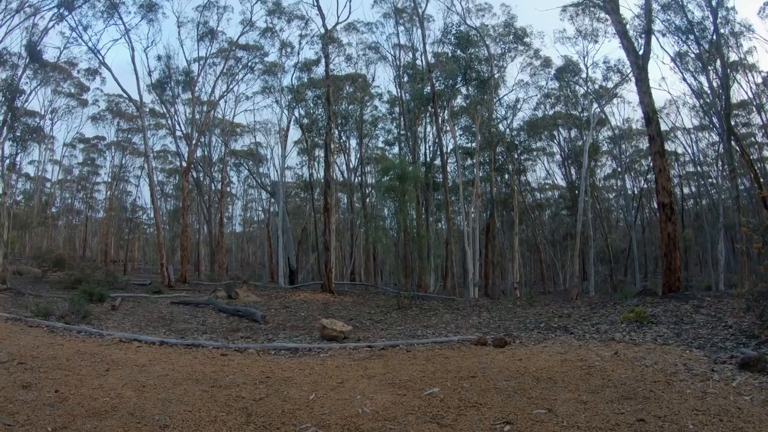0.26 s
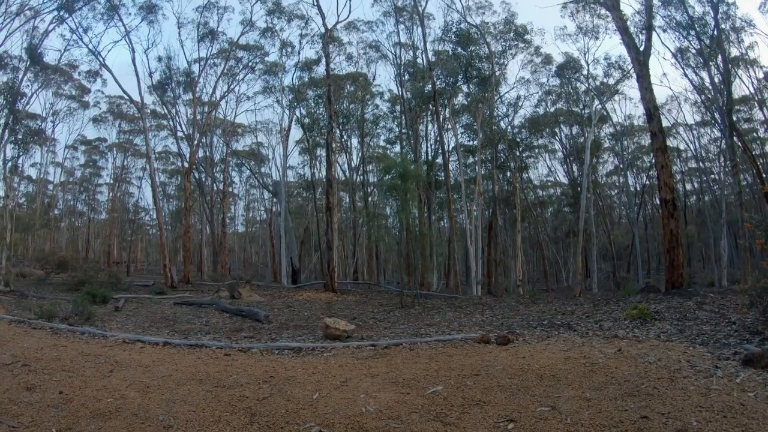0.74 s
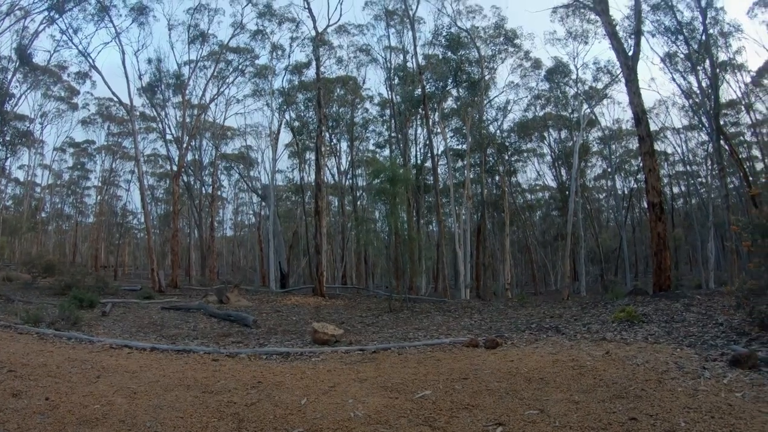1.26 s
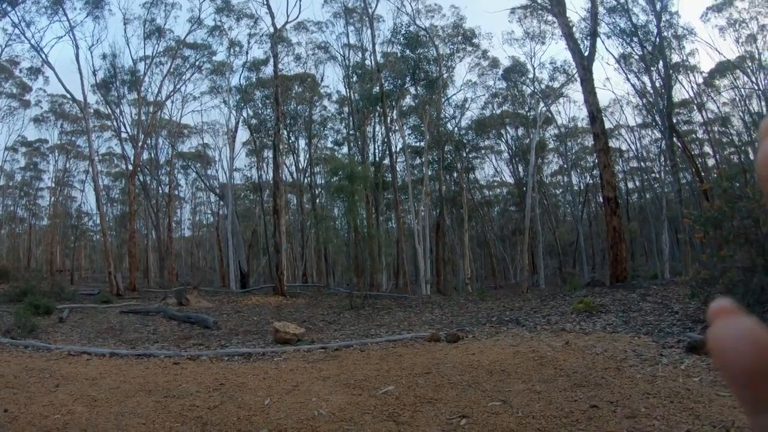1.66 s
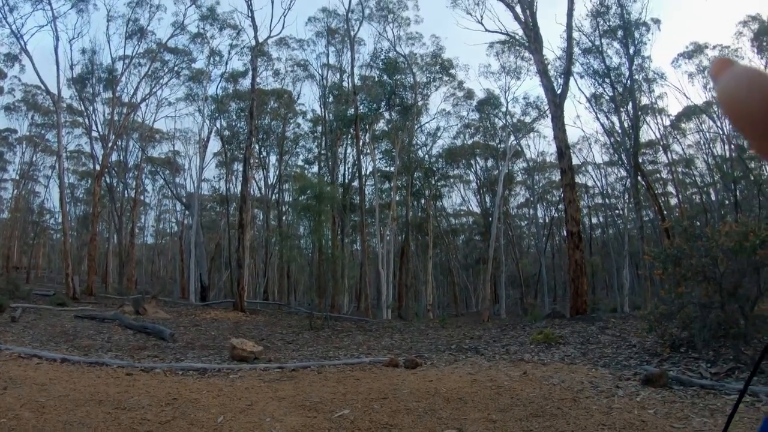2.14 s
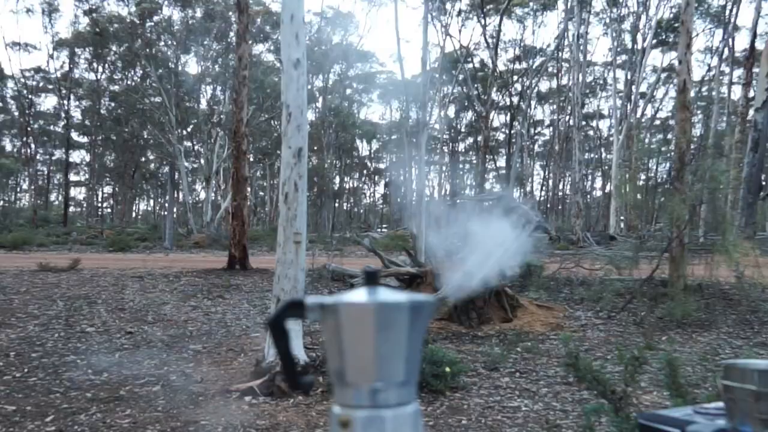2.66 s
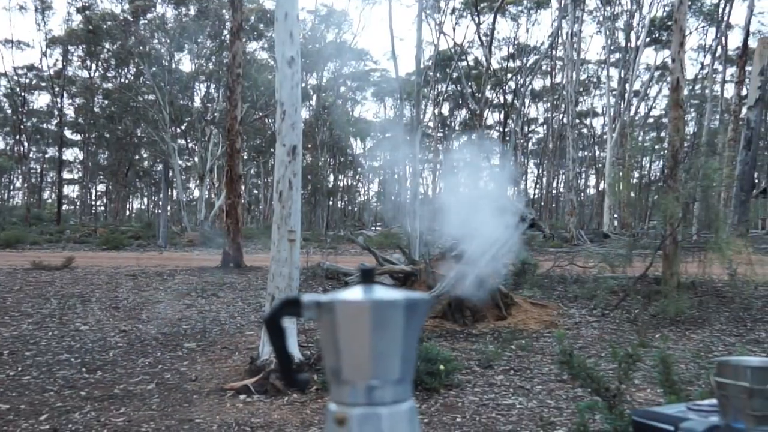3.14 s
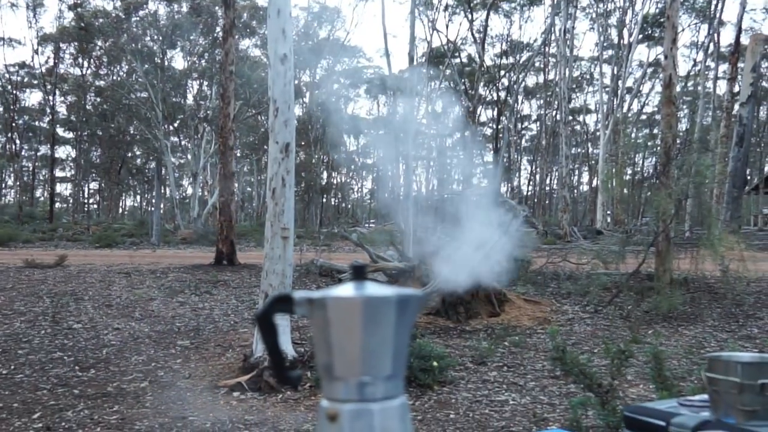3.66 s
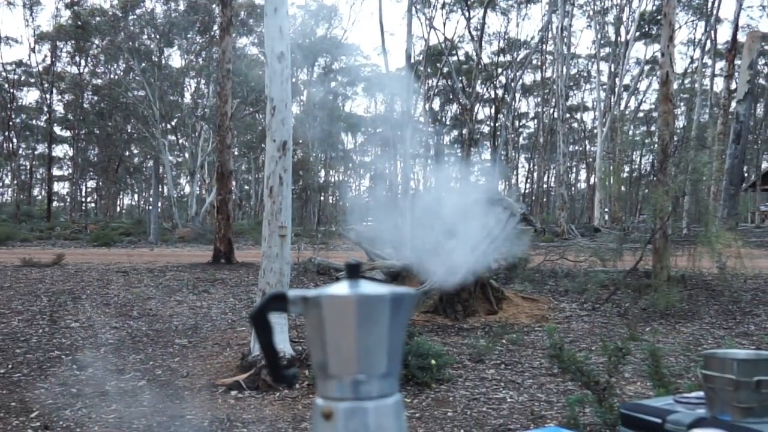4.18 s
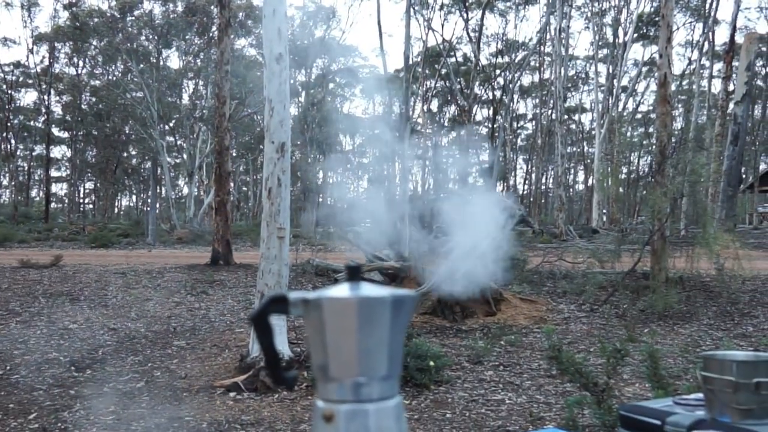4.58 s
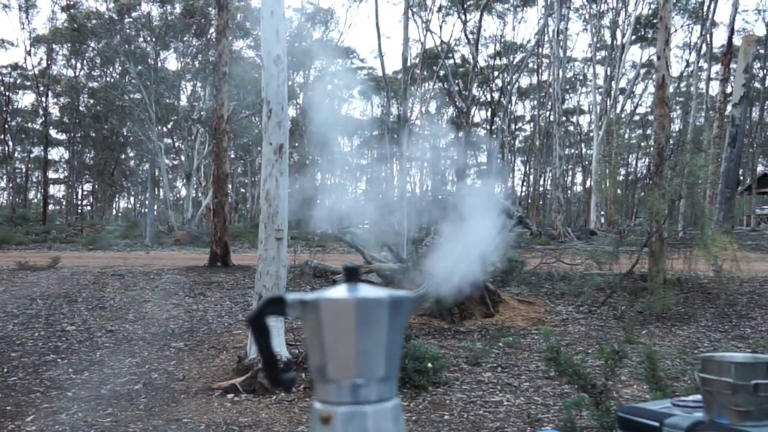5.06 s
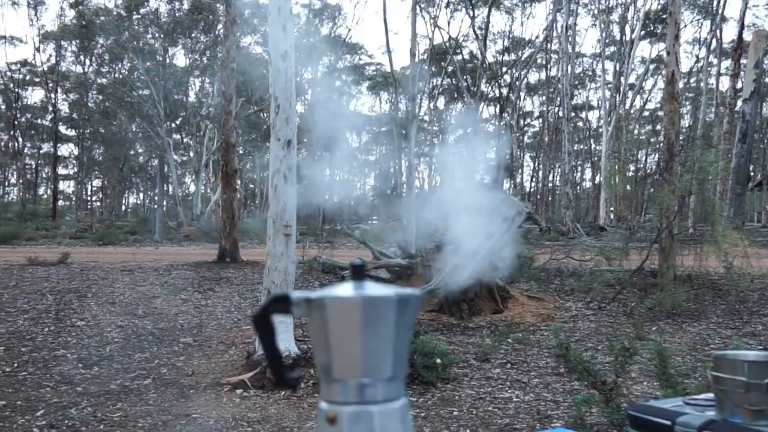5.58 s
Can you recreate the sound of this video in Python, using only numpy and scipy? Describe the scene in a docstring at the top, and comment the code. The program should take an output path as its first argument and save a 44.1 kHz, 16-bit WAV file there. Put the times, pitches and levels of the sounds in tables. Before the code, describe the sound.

A hushed outdoor forest with faint bird whistles. Fingers softly bump the camera, then a hard knock, skin rubbing and a low thud come directly through its case. At about 2.7 seconds it cuts abruptly to a metal stovetop coffee pot close to the microphone, gurgling in fast uneven bursts, spitting on its lid and hissing steam more strongly until the end.

```python
"""Faint birds at a quiet forest campsite; a hand bumps, knocks and rubs a camera body.
At CUT_S the hand gives way to a stovetop moka pot ending its brew; forest and birds run on underneath.
Hand: clicks and shaped noise excite the case; slow damped swings are its flexing. Birds: gliding sines.
Pot: steam bursts thump the chamber and spit on the metal lid; filtered noise is the hiss and the
bright, slowly growing jet, over a soft burner roar."""
import sys
import numpy as np
from scipy import signal
from scipy.fft import rfft, irfft, next_fast_len
from scipy.io import wavfile
from scipy.ndimage import uniform_filter1d

SR = 44100
rng = np.random.default_rng(int(sys.argv[2]) if len(sys.argv) > 2 else 0)


def generate_wav(signal):
    """Clip the signal to [-1, 1] and save it as 16-bit WAV at the path in sys.argv[1]."""
    frames = np.transpose(np.atleast_2d(signal))
    scaled = np.clip(frames, -1, 1) * 32767
    pcm = np.round(scaled).astype(np.int16)
    wavfile.write(sys.argv[1], SR, pcm)


N = 256662
T = np.arange(N) / SR  # time_s
CUT_S, CUTOFF_HZ = 2.699, 15750

# Levels in the tables are relative; the source functions add trims in dB.
# Forest bed spectrum: band_hz, gain_db
FOREST_SPECTRUM = [(15, -33), (25, -9), (53, 2.5), (98, -8.5), (202, 1), (394, -11), (573, -8.5), (729, -2),
                   (856, -0.5), (1030, -11), (1350, -14.5), (2780, -18.5), (3630, -25.5), (9270, -31.5),
                   (15000, -43)]
# Forest bed left-right likeness: band_hz, likeness (-1 to 1)
FOREST_LIKENESS = [(60, -0.17), (240, -0.59), (950, -0.83), (3770, 0.3), (15000, -0.26)]
# Distant bird calls: start_s, length_s, start_hz, end_hz, level_db, waver_hz (rms)
BIRD_CALLS = [(-0.08, 0.26, 2650, 2650, -57, 322), (0.127, 0.21, 2750, 2750, -60, 325),
              (0.01, 0.021, 2950, 3100, -62, 30), (0.168, .035, 3000, 3100, -58, 30),
              (0.4, 0.1, 1540, 1460, -67, 50), (0.685, 0.15, 1775, 1770, -68, 25),
              (.78, .1, 2280, 2350, -72, 25), (1.147, 0.058, 2900, 2700, -66, 70),
              (1.628, 0.036, 2850, 2670, -36.5, 55), (1.827, 0.015, 2900, 2610, -34, 45.8),
              (3.674, .12, 2620, 2870, -45.5, 122), (3.797, 0.198, 2780, 2750, -47, 167)]

# Finger bumps on the camera: start_s, bump_db, tick_db, left_minus_right_db (bump only)
BUMPS = [(0.061, -36, -45, 1), (0.482, -48.5, -67, -8), (0.579, -53.5, -69, -10), (0.613, -58, -70, -11),
         (0.963, -50, -70, 11), (1.22, -47.5, -56, -15), (1.265, -59, -43, 2), (1.274, -46, -53, 5),
         (1.475, -40.5, -46, -13), (1.516, -37.5, -34, -10), (1.605, -34, -32.5, -7),
         (1.616, -34.5, -36, -11), (2.222, -37, -38, 11)]
# Dull bump spectrum: band_hz, gain_db
BUMP_SPECTRUM = [(40, -8), (90, -22), (150, 10.5), (230, 0), (320, -8.5), (450, -21), (700, -16),
                 (2000, -64)]
# Fingertip tick spectrum: band_hz, gain_db
TICK_SPECTRUM = [(300, -18), (800, -4), (1080, 0.5), (1300, 8.5), (1550, 1), (2000, 0), (3000, -9),
                 (5000, -37), (10000, -28), (16000, -60)]
# Hard knocks on the case: start_s, knock_db, treble_re_knock_db
KNOCKS = [(1.6809, -20, -11), (1.6867, 1, -9.5), (1.6961, -21, -6), (1.7, -14, -16), (1.7041, -10.5, -13),
          (1.7139, -10.5, -3.5), (1.7996, -37, 18), (1.924, -52, -7), (2.4539, -28, -5)]
# Case spectrum under a knock: band_hz, gain_db
CASE_SPECTRUM = [(200, -12), (600, -12.5), (1000, -12), (1350, -2.5), (1600, -11), (1950, 2), (2250, -4),
                 (2750, 1), (3500, -13), (4400, -10.5), (5300, -24.5), (12000, -44)]
# Treble crack spectrum of a knock: band_hz, gain_db
CRACK_SPECTRUM = [(2000, -22.5), (4400, -6), (5500, -7), (6700, 9), (8500, -2), (10000, -5), (12000, -31),
                  (16000, -49)]
# Case flexing under the grip: start_s, swing_hz, level_db, decay_s, right_to_left_ratio
FLEXES = [(0.059, 70.5, -39, 0.0059, 2.7), (1.689, 241, -21, 0.0075, 0.17), (1.695, 149, -19, 0.0081, 0.02),
          (1.704, 63, -25, 0.011, 2.6), (1.799, 44.4, -33, 0.012, 0.76), (2.577, 30.6, -4, 0.022, -0.48),
          (2.636, 71.4, -21, 0.01, 0.95)]
# Strokes of skin over the case: start_s, length_s, body_db, friction_db, rumble_db
STROKES = [(1.262, 0.014, -64, -63, -47), (1.29, 0.02, -56.5, -52, -64), (1.41, 0.02, -47.5, -48, -50),
           (1.46, 0.014, -49, -54.5, -51), (1.71, 0.036, -32.5, -36, -31.5), (1.76, 0.04, -45, -46, -45),
           (1.795, 0.073, -38.5, -36, -45), (1.87, 0.062, -33, -29.5, -70), (1.955, 0.058, -43, -38.5, -66),
           (2.04, 0.036, -44.5, -40.5, -42), (2.212, 0.097, -41.5, -34.5, -40),
           (2.34, 0.013, -45, -79, -35), (2.388, 0.023, -49, -53.5, -46), (2.455, 0.081, -43.5, -39.5, -44),
           (2.545, 0.068, -37.5, -46.5, -29), (2.585, 0.021, -34, -50, -17.5),
           (2.64, 0.046, -45.5, -61, -21.5)]
# Hand resting on the case: body_db, friction_db, rumble_db
GRIP_DB = [-59, -63.5, -59]
# Rubbed case spectrum: band_hz, gain_db
RUB_BODY_SPECTRUM = [(100, -34), (160, -8), (300, -25), (600, -18.5), (1150, -10), (1300, 13), (1440, 0.5),
                     (1650, 1), (2000, -1), (2400, -2.5), (3200, -23), (6000, -53)]
# Skin friction spectrum: band_hz, gain_db
FRICTION_SPECTRUM = [(1700, -32), (2700, -2), (3300, 2), (3900, -0.5), (4800, -4.5), (6000, -3.5),
                     (7500, -4.5), (8300, -6), (9200, -8), (10500, -15.5), (12000, -25.5), (15500, -33)]
# Shaken case spectrum: band_hz, gain_db
RUMBLE_SPECTRUM = [(12, -2), (25, -3), (45, -7), (80, -35), (160, -22.5), (400, -44.5), (1000, -85)]
# Rubbing left-right likeness: band_hz, likeness (-1 to 1)
RUB_LIKENESS = [(60, -0.31), (600, -0.78), (1300, -0.9), (1700, -0.43), (2200, 0.097), (3200, 0.58),
                (6800, -0.1), (15000, 0)]

# Burner roar spectrum: band_hz, gain_db
BURNER_SPECTRUM = [(20, -30), (45, -13), (85, -4.5), (140, 2.5), (250, -7.5), (400, 2), (700, -7),
                   (1500, -74)]
# Steady steam flow, growing as the pot runs dry: time_s, jet_db
STEAM_FLOW = [(2.7, -52), (3.08, -50.5), (3.25, -45.5), (3.8, -47), (4.5, -42.5), (4.95, -42.5),
              (5.25, -40.5), (5.82, -38)]
# Steam puffs on top of the flow: start_s, length_s, jet_db
STEAM_PUFFS = [(2.735, 0.056, -46), (2.84, 0.052, -48.5), (3.148, 0.02, -39.5), (3.345, 0.031, -43.5),
               (3.63, 0.021, -41), (3.97, 0.22, -45.5), (4.29, 0.045, -41.5)]
# Broad hiss spectrum: band_hz, gain_db
HISS_SPECTRUM = [(410, -1), (700, -2), (832, -17), (956, -7.5), (1250, -15), (1370, -8.5), (1680, -13),
                 (2170, -8), (4580, -12), (4910, -9.5), (6860, -11), (8940, -9.5), (9920, -12.5),
                 (11000, -23), (14300, -49), (22000, -120)]
# Narrow jet spectrum: band_hz, gain_db
JET_SPECTRUM = [(8500, -35), (10200, -12.5), (11100, -1), (11700, -3), (12200, 3.5), (12750, -0.5),
                (13300, -0.5), (13900, -6), (14550, -8.5), (15800, -8)]
# Steam left-right likeness: band_hz, likeness (-1 to 1)
STEAM_LIKENESS = [(600, 0.89), (1400, 0.6), (3100, 0.15), (6800, 0.62), (12000, -0.13), (15000, -0.3)]
# Wet metal pot resonances: mode_hz, width_hz, gain_db
POT_MODES = [(976, 33, 1), (1374, 47, 6), (1600, 41, -7.5), (2100, 265, 2.5), (2320, 290, 0.5),
             (2700, 590, -23), (3293, 34, 1.5), (3440, 120, -9), (3600, 180, -12)]
# Wet splash spectrum: band_hz, gain_db
SPLASH_SPECTRUM = [(1500, -45), (3000, 9), (4500, 6.5), (6100, 10), (7000, 11), (8600, 3), (11000, -26),
                   (16000, -40)]
# Drops flashing to steam on hot metal: start_s, level_db
SIZZLES = [(2.869, -43), (3.355, -34), (5.405, -31), (5.453, -31.5)]
# Gulps of steam bursting from the spout: start_s, thump_db, spit_db (coffee against the lid)
GULPS = [(2.763, -22.5, -49), (2.798, -22, -25.5), (2.813, -17.5, -21.5), (2.838, -21, -37),
         (2.921, -22.5, -46), (2.955, -20.5, -38.5), (3.023, -21.5, -48), (3.063, -19.5, -24.5),
         (3.089, -17.5, -23), (3.133, -19.5, -52), (3.157, -16, -20), (3.221, -15.5, -21.5),
         (3.241, -17.5, -21.5), (3.303, -15, -22), (3.393, -18, -57), (3.408, -26, -54),
         (3.461, -18, -27.5), (3.504, -16, -29), (3.556, -20, -49), (3.589, -16.5, -35),
         (3.614, -19.5, -26.5), (3.634, -19, -40), (3.670, -25.5, -27), (3.734, -19.5, -38),
         (3.770, -16, -22), (3.792, -21.5, -31), (3.845, -21, -46), (3.875, -21.5, -44), (3.941, -23, -38),
         (3.994, -17.5, -33), (4.065, -21.5, -24.5), (4.099, -18, -22.5), (4.119, -15, -21.5),
         (4.142, -17, -23.5), (4.167, -18, -22.5), (4.199, -15.5, -21.5), (4.228, -18, -46),
         (4.275, -14.5, -21), (4.390, -16, -45), (4.454, -16.5, -47), (4.476, -17, -22.5),
         (4.568, -18, -42), (4.630, -15, -26.5), (4.7041, -16, -40), (4.724, -18, -19.5),
         (4.734, -15, -22.5), (4.8, -25, -56), (4.875, -17, -46), (4.890, -15.5, -27), (4.903, -11, -18),
         (4.953, -15, -22), (4.968, -17, -34), (5.016, -12.5, -19), (5.093, -15, -21.5),
         (5.285, -21.5, -40), (5.299, -15.5, -22.5), (5.312, -17, -20.5), (5.33, -13, -21),
         (5.363, -18.5, -27), (5.479, -19.5, -40), (5.569, -20, -29), (5.621, -16.5, -26),
         (5.656, -16, -26.5), (5.691, -13.5, -17.5), (5.767, -19.5, -47)]
# Vigour of small bubbles between gulps: time_s, level_db
BUBBLING = [(2.7, -40), (2.8, -30), (2.92, -45.5), (3.1, -34), (3.35, -38), (3.75, -33), (3.9, -51),
            (4.05, -41), (4.23, -31.5), (4.35, -38.5), (4.62, -35.5), (4.85, -31.5), (5.18, -39),
            (5.33, -31), (5.44, -46), (5.54, -41.5), (5.68, -29.5), (5.82, -39.5)]
# Air in the upper chamber: band_hz, gain_db
CHAMBER_SPECTRUM = [(30, -32), (60, -40), (110, -14), (190, 0), (270, 2), (400, 1.5), (560, -8.5),
                    (700, -11), (850, -35), (1300, -27), (3000, -78)]

GRIP_START_S = 1.25  # the hand rests on the case from here
STROKE_ATTACK_S, STROKE_RELEASE_S = 0.013, 0.02
PUFF_ATTACK_S, PUFF_RELEASE_S = 0.007, 0.028
PUFF_HISS_DB = -3.5  # puff hiss gain re puff jet gain: puffs are wet
HISS_DB_PER_FLOW_DB = 0.57
FLUTTER_DB, FLUTTER_PER_S = 2.06, 35  # hiss flutters as coffee crosses the gap
SPIT_LAG_S = 0.0027  # drop flight, spout to lid
SPLASH_DB_PER_DB, SPLASH_KNEE_DB = 2.76, -22  # harder spits splash disproportionately brighter
CHURN_DB, CHURN_DECAY_S = -14, 0.017  # small bubbles stirred up by a gulp, then settling
PLUG_S, EMPTY_S = 0.012, 0.004  # spout plugged before a gulp, empty after it: no small bubbles


def from_db(db):
    """Decibels to gain."""
    return 10 ** (np.asarray(db) / 20)


def rms_one(x):
    """Scale to unit rms."""
    return x / np.sqrt(np.mean(x ** 2) + 1e-20)


def gains(rows):
    """One interpolated gain curve per dB column."""
    time_s, *columns_db = np.transpose(rows)
    return [from_db(np.interp(T, time_s, column_db)) for column_db in columns_db]


def at_hz(points, hz):
    """Read a table on a log-frequency axis."""
    band_hz, value = np.transpose(points)
    return np.interp(np.log(hz + 1), np.log(band_hz), value)


def pan(left_minus_right_db):
    """Left and right gains for a level difference."""
    return from_db(np.array([[left_minus_right_db], [-left_minus_right_db]]) / 2)


def drift(rate_per_s):
    """Random curve of unit rms: straight lines between random points."""
    return rms_one(np.interp(T * rate_per_s, np.arange(8192), rng.standard_normal(8192)))


def late(x, delay_s):
    """Delay a signal."""
    return np.interp(T - delay_s, T, x, left=0)


def noise(spectrum, likeness):
    """Stereo noise of unit rms: mid and side shares set the likeness per band."""
    size = next_fast_len(N)
    hz = np.arange(size // 2 + 1) * SR / size
    mid, side = rfft(rng.standard_normal((2, size))) * from_db(at_hz(spectrum, hz))
    alike = np.clip(at_hz(likeness, hz), -1, 1)
    stereo = np.sqrt(1 + alike) * mid + np.sqrt(1 - alike) * side * [[1], [-1]]
    return rms_one(irfft(stereo, size)[:, :N])


def ring(x, spectrum, size=4096):
    """Damped body as a minimum-phase filter: a unit click gives a pulse of peak 1."""
    hz = np.arange(size // 2 + 1) * SR / size
    cepstrum = irfft(np.log(from_db(at_hz(spectrum, hz))))
    # fold the cepstrum to make the pulse causal
    cepstrum[1:size // 2] *= 2
    cepstrum[size // 2 + 1:] = 0
    pulse = irfft(np.exp(rfft(cepstrum)))[:size // 2]
    return signal.oaconvolve(x, pulse / np.abs(pulse).max())[:N]


def resonate(x, modes):
    """Parallel two-pole resonances; wider modes die sooner."""
    out = 0
    for mode_hz, width_hz, gain_db in modes:
        radius = np.exp(-np.pi * width_hz / SR)
        zeros = [(1 - radius ** 2) / 2, 0, (radius ** 2 - 1) / 2]
        poles = [1, -2 * radius * np.cos(2 * np.pi * mode_hz / SR), radius ** 2]
        out = out + from_db(gain_db) * signal.lfilter(zeros, poles, x + 1e-18)
    return out


def spray(starts_s, levels_db, rise_s, size=2000):
    """Clouds of tiny drops: noise that swells and thins out."""
    age = np.arange(size) / (rise_s * SR)
    out = np.zeros(N + size)
    for start_s, level_db in zip(starts_s, levels_db):
        cloud = rng.standard_normal(size) * age * np.exp(-age)
        at = int(start_s * SR)
        out[at:at + size] += from_db(level_db) * cloud / np.linalg.norm(cloud)
    return out[:N]


def hits(starts_s, levels_db, scatter, decay_s, size=6000):
    """Contacts: a click plus a dying scatter of tiny ones."""
    out = np.zeros(N + size)
    for start_s, level_db in zip(starts_s, levels_db):
        tail = rng.standard_normal(size) * np.exp(-np.arange(size) / (decay_s * SR))
        tail *= scatter / np.linalg.norm(tail)
        tail[0] += 1
        at = int(np.clip(start_s * SR, 0, N))
        out[at:at + size] += from_db(level_db) * tail
    return out[:N]


def envelope(start_s, length_s, attack_s, release_s):
    """Straight rise, hold to the end of length_s, exponential release."""
    rise = np.clip((T - start_s) / attack_s, 0, 1)
    return rise * np.exp(-np.clip((T - start_s - length_s) / release_s, 0, 40))


def swells(rows, attack_s, release_s):
    """Envelopes summed in power: one gain curve per dB column."""
    power = 0
    for start_s, length_s, *levels_db in rows:
        shape = envelope(start_s, length_s, attack_s, release_s)
        power = power + (from_db(levels_db)[:, None] * shape) ** 2
    return np.sqrt(power)


def patchy(x, spread_db, size=512):
    """Narrow bands swell and sink on their own as the contact shifts."""
    cells = signal.stft(x, nperseg=size)[2]
    swell = rng.standard_normal(cells.shape[1:])
    swell = uniform_filter1d(swell, size=3, axis=0)  # across bands
    swell = uniform_filter1d(swell, size=8, axis=1)  # across time
    shifted = cells * from_db(spread_db * rms_one(swell))
    return rms_one(signal.istft(shifted, nperseg=size)[1][:, :N])


def forest_bed(level_db):
    """Steady forest ambience: coloured stereo noise."""
    return from_db(level_db) * noise(FOREST_SPECTRUM, FOREST_LIKENESS)


def birds(trim_db):
    """Far whistles: sines that glide, waver and fade in and out."""
    out = np.zeros((2, N))
    for start_s, length_s, start_hz, end_hz, level_db, waver_hz in BIRD_CALLS:
        along = np.clip((T - start_s) / length_s, 0, 1)
        pitch_hz = start_hz + (end_hz - start_hz) * along + waver_hz * drift(700)
        phase = 2 * np.pi * np.cumsum(pitch_hz) / SR
        whistle = np.sin([phase, phase + 1.56])  # phase offset in rad widens the image
        out += from_db(level_db + trim_db) * np.sin(np.pi * along) * whistle
    return out


def burner(level_db):
    """Soft burner roar: low-frequency noise."""
    return from_db(level_db) * noise(BURNER_SPECTRUM, [(40, 0.33), (200, 0.96)])


def taps(bump_db, tick_db, knock_db, crack_db):
    """Soft bumps and hard knocks reach each microphone port through the case."""
    bump_s, bump_level_db, tick_level_db, balance_db = np.transpose(BUMPS)
    knock_s, knock_level_db, treble_db = np.transpose(KNOCKS)
    sides = []
    for sign in (1, -1):
        side_db = bump_level_db + bump_db + sign * balance_db / 2
        bumps = hits(bump_s + 0.0016, side_db, scatter=1.0, decay_s=0.01)
        ticks = hits(bump_s + 0.00099, tick_level_db + tick_db, scatter=1.0, decay_s=0.0063)
        knocks = hits(knock_s + 0.00088, knock_level_db + knock_db, scatter=0.97, decay_s=0.0032)
        crack_level_db = knock_level_db + treble_db + crack_db
        cracks = hits(knock_s + 0.0005, crack_level_db, scatter=2.6, decay_s=0.0019)
        soft = ring(bumps, BUMP_SPECTRUM) + ring(ticks, TICK_SPECTRUM)
        hard = ring(knocks, CASE_SPECTRUM) + ring(cracks, CRACK_SPECTRUM)
        sides.append(soft + hard)
    return np.array(sides)


def flexes():
    """Squeezed case swings slowly; a negative ratio pushes one port while pulling the other."""
    out = np.zeros((2, N))
    for start_s, swing_hz, level_db, decay_s, ratio in FLEXES:
        age_s = np.maximum(T - start_s, 0)
        shape = age_s / decay_s * np.exp(1 - age_s / decay_s)
        out += from_db(level_db) * shape * np.sin(2 * np.pi * swing_hz * age_s) * [[1], [ratio]]
    return out


def rubbing(body_db, friction_db, rumble_db, grain_db, patchy_db):
    """Sliding skin catches in fine grains that ring the case, hiss and shake it."""
    grip = (GRIP_START_S, CUT_S - GRIP_START_S, *GRIP_DB)
    body, friction, rumble = swells(STROKES + [grip], STROKE_ATTACK_S, STROKE_RELEASE_S)
    grains = from_db(grain_db * drift(500) + 1.1 * drift(50))
    slide = body * from_db(body_db) * patchy(noise(RUB_BODY_SPECTRUM, RUB_LIKENESS), patchy_db)
    slide += friction * from_db(friction_db) * patchy(noise(FRICTION_SPECTRUM, RUB_LIKENESS), patchy_db)
    shake = rumble * from_db(rumble_db) * noise(RUMBLE_SPECTRUM, RUB_LIKENESS)
    return grains * slide + shake


def steam(hiss_db, jet_db):
    """Broad hiss and narrow bright jet at the lid gap follow the flow and its puffs."""
    flow, = gains(STEAM_FLOW)
    puffs, = swells(STEAM_PUFFS, PUFF_ATTACK_S, PUFF_RELEASE_S)
    steady_hiss = from_db(hiss_db) * flow ** HISS_DB_PER_FLOW_DB
    puff_hiss = from_db(jet_db + PUFF_HISS_DB) * puffs
    flutter = from_db(FLUTTER_DB * drift(FLUTTER_PER_S) + 0.67 * drift(9))
    hiss = np.hypot(steady_hiss, puff_hiss) * flutter * noise(HISS_SPECTRUM, STEAM_LIKENESS)
    jet_gain = np.hypot(flow, puffs) * from_db(jet_db + 0.91 * drift(60))
    jet = jet_gain * noise(JET_SPECTRUM, STEAM_LIKENESS)
    return hiss * pan(-1.1) + jet * pan(-4.0)


def spits(metal_db, splash_db, sizzle_db, mode_spread_db):
    """Drops thrown at the lid: short metal ring and wet splash; a few sizzle away."""
    gulp_s, _, spit_db = np.transpose(GULPS)
    spit_s = gulp_s + SPIT_LAG_S
    metal = 0
    for mode in POT_MODES:
        # each drop lands somewhere else and favours other modes
        drop_db = spit_db + rng.normal(0, mode_spread_db, len(spit_s))
        metal = metal + resonate(hits(spit_s, drop_db, scatter=1.4, decay_s=0.0082, size=768), [mode])
    sizzle_s, sizzle_level_db = np.transpose(SIZZLES)
    splash_level_db = splash_db + SPLASH_DB_PER_DB * (spit_db - SPLASH_KNEE_DB)
    sides = []
    for _ in range(2):
        scattered = resonate(hits(spit_s, spit_db - 23.5, scatter=8.4, decay_s=0.037), POT_MODES)
        splash = spray(spit_s, splash_level_db, rise_s=0.0012)
        sizzle = hits(sizzle_s, sizzle_level_db + sizzle_db, scatter=4.4, decay_s=0.012)
        wet = ring(splash + sizzle, SPLASH_SPECTRUM)
        sides.append(from_db(metal_db) * (metal + scattered) + wet)
    return np.array(sides) * pan(-0.88)


def vigour():
    """Small-bubble strength: slow boil plus the decaying churn left by each gulp."""
    gulp_s, thump_db, _ = np.transpose(GULPS)
    kicks = np.zeros(N)
    kicks[(gulp_s * SR).astype(int)] = from_db(thump_db + CHURN_DB)
    churn = signal.lfilter([1], [1, -np.exp(-1 / (CHURN_DECAY_S * SR))], kicks)
    boil, = gains(BUBBLING)
    return np.hypot(boil, churn)


def gurgle(gulp_db, bubble_db, gap_s, spread_db, clump_db, size_ratio, echo, crackle_db, count=900):
    """Slugs of steam burst at uneven gaps and thump the air in the chamber."""
    gulp_s, thump_db, _ = np.transpose(GULPS)
    gulps = hits(gulp_s + 0.00055, thump_db + gulp_db, scatter=0.62, decay_s=0.01)
    gap_chance, level_chance, size_chance = rng.random((3, count))
    bubble_s = CUT_S + np.cumsum(gap_s * (0.4 + 1.2 * gap_chance))
    since_gulp_s = bubble_s[:, None] - gulp_s
    blocked = ((since_gulp_s > -PLUG_S) & (since_gulp_s < EMPTY_S)).any(axis=1)
    heard = (bubble_s < T[-1]) & ~blocked
    level = vigour() * from_db(clump_db * np.tanh(drift(70)))  # small bubbles come in clumps
    pop_db = spread_db * (2 * level_chance - 1.5) + bubble_db
    bursts, thumps = gulps, ring(gulps, CHAMBER_SPECTRUM)
    # large, middling, small bubbles: the smaller, the higher the plop
    for size_class, pitch_ratio in enumerate([1 / size_ratio, 1, size_ratio]):
        mine = heard & (np.floor(3 * size_chance) == size_class)
        pops = np.zeros(N)
        pops[(bubble_s[mine] * SR).astype(int)] = from_db(pop_db[mine])
        pops = pops * level
        bursts = bursts + pops
        thumps = thumps + ring(pops, np.array(CHAMBER_SPECTRUM) * [pitch_ratio, 1])
    # each burst flicks a little coffee at the metal
    crackle = from_db(crackle_db) * resonate(late(bursts, 0.002555), POT_MODES)
    # one near reflection ripples the spectrum
    return echo * late(thumps, 0.00602) - thumps + crackle


def scene():
    """Forest throughout; the handled camera up to CUT_S, then the pot close by."""
    forest = forest_bed(level_db=-57.5) + birds(trim_db=1.5)
    hand = taps(bump_db=-2.0, tick_db=2.5, knock_db=1, crack_db=-5.5) + flexes()
    hand += rubbing(body_db=4.5, friction_db=1.0, rumble_db=3.5, grain_db=0.7, patchy_db=2.5)
    pot = burner(level_db=-45.5) + steam(hiss_db=-19.5, jet_db=3.0)
    pot += spits(metal_db=19.0, splash_db=-23.5, sizzle_db=2.5, mode_spread_db=1)
    pot += gurgle(gulp_db=-0.42, bubble_db=8.5, gap_s=0.0068, spread_db=5.5, clump_db=5.5,
                  size_ratio=1.228, echo=0.38, crackle_db=-8.5)
    after_cut = np.clip((T - CUT_S) / 0.002, 0, 1)
    return forest + (1 - after_cut) * hand + after_cut * pot


def record(dry):
    """Overload rounds off the hardest knock; a steep low-pass cuts the top."""
    rounded = dry / (1 + dry ** 4) ** 0.25
    low_pass = signal.ellip(12, 0.1, 95, CUTOFF_HZ, fs=SR, output="sos")
    return signal.sosfilt(low_pass, rounded)


dry = scene()
out = record(dry)
generate_wav(out)
```